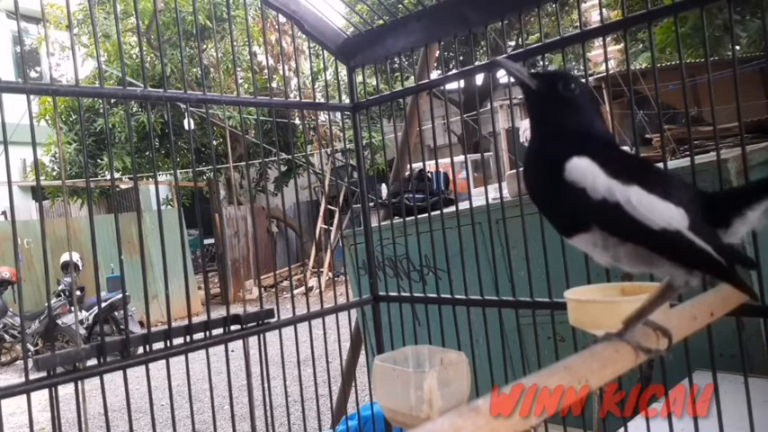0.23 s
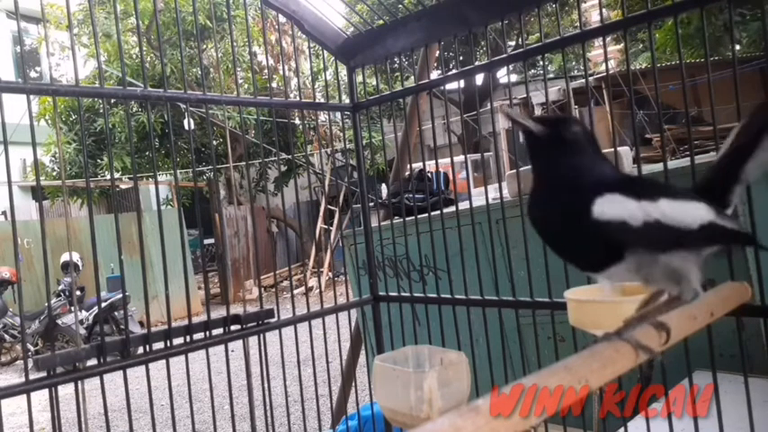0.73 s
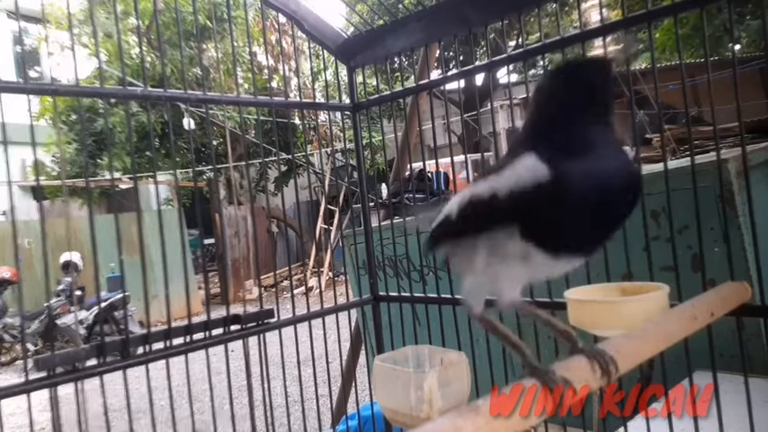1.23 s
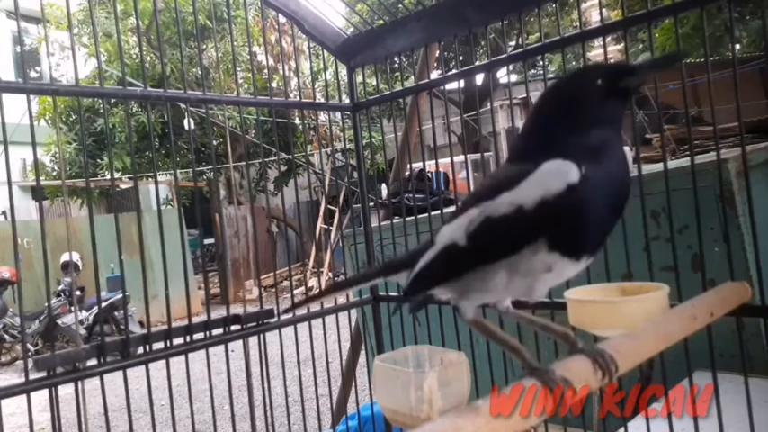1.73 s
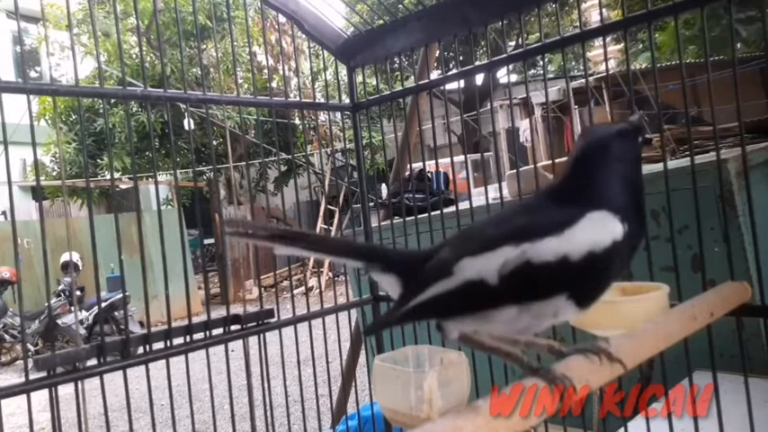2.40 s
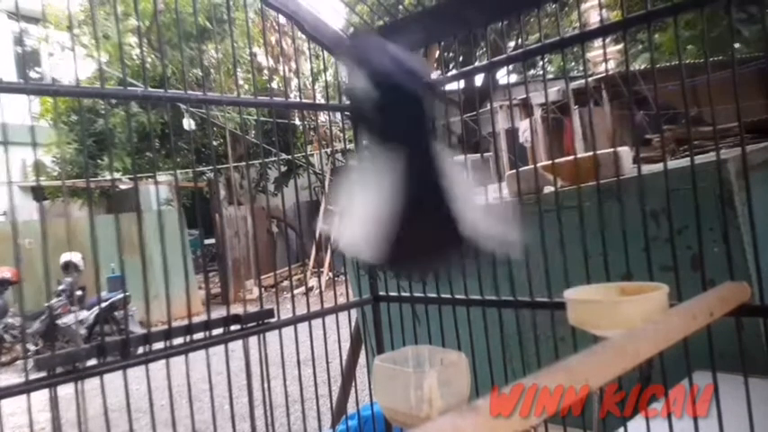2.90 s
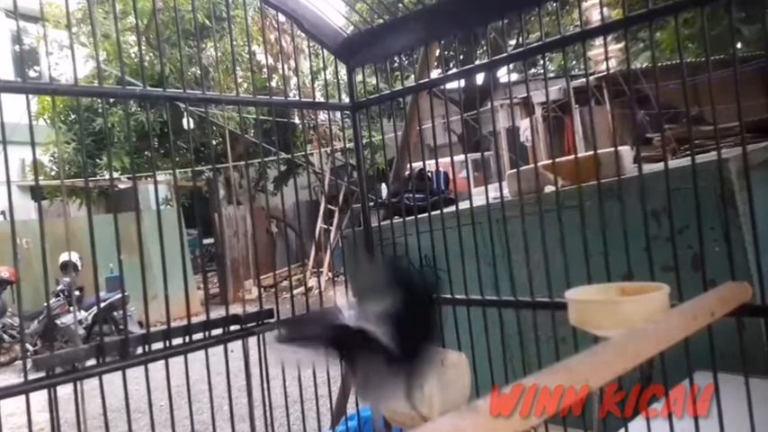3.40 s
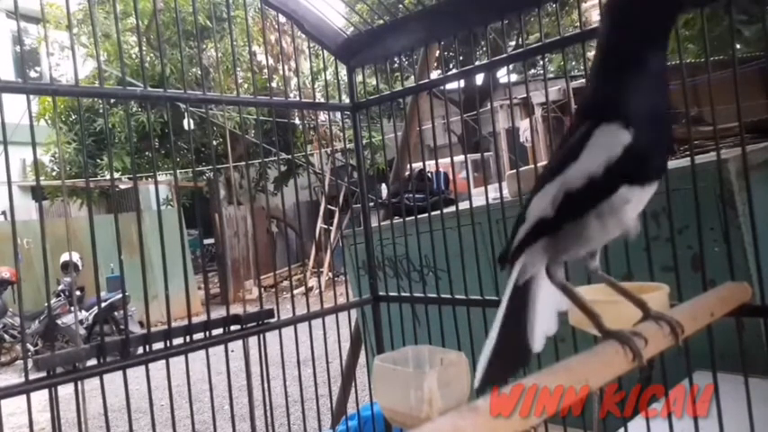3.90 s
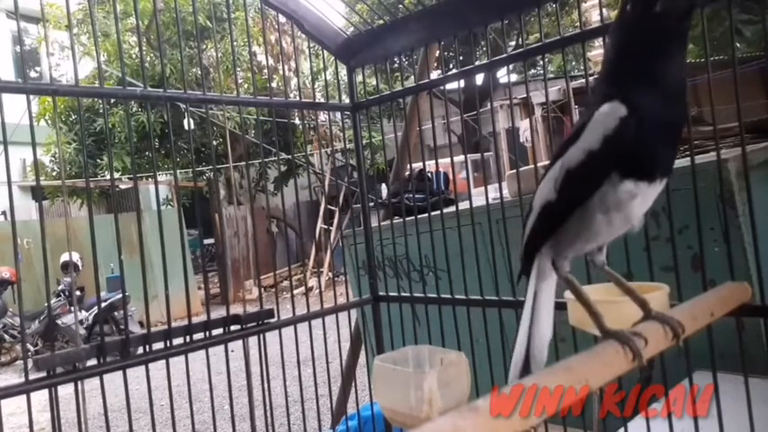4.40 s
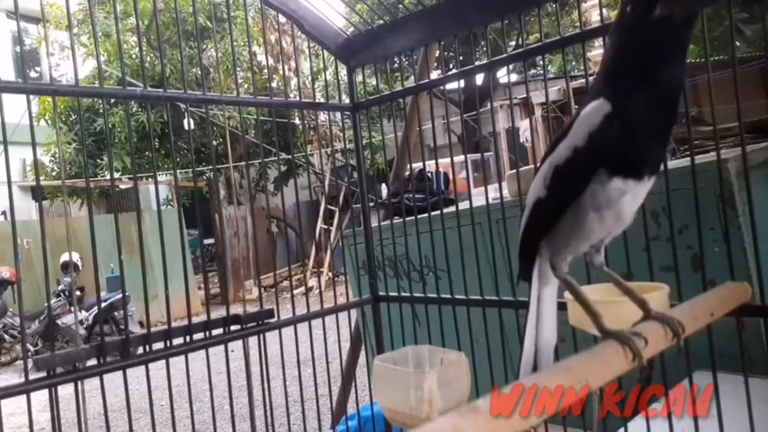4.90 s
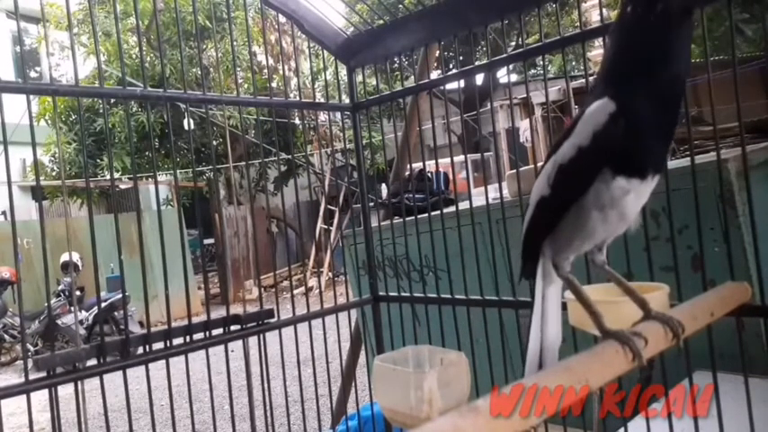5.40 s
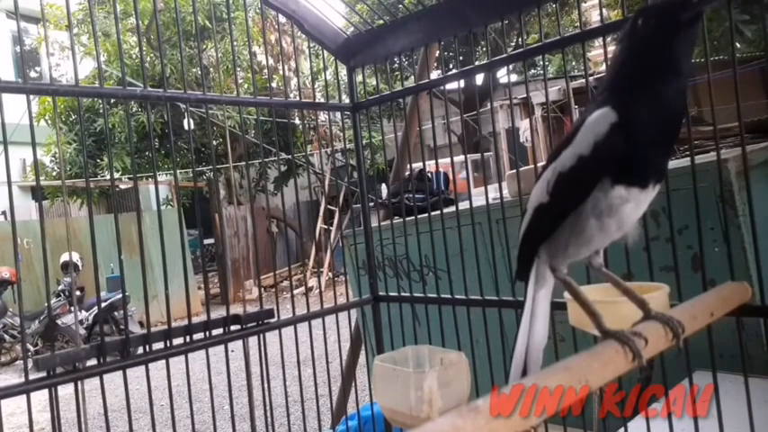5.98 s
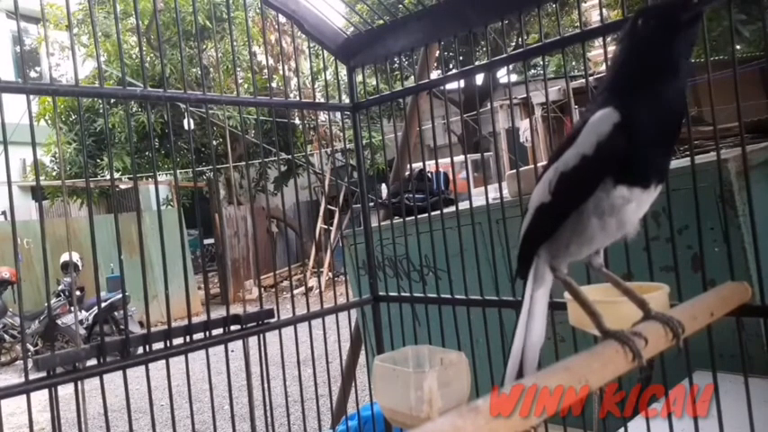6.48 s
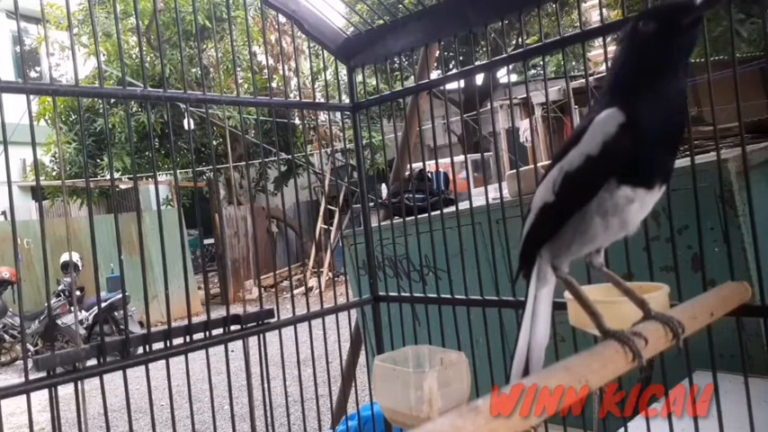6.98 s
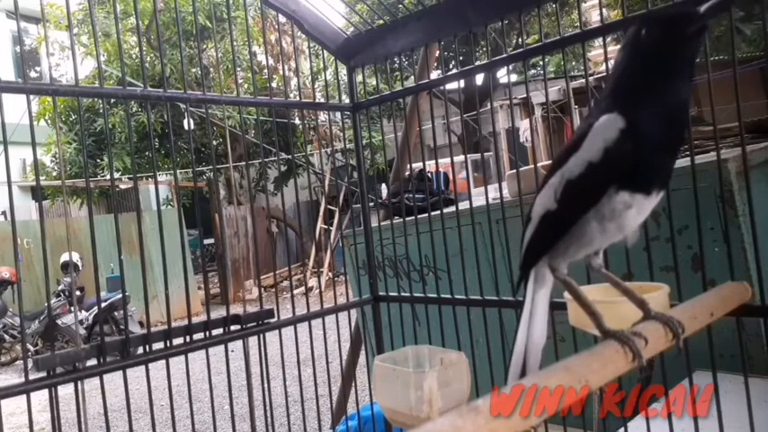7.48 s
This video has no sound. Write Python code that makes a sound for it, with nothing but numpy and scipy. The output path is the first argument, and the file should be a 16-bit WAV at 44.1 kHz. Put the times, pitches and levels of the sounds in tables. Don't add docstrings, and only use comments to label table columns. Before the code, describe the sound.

Faint yard birds and soft whistles lead to a close songbird's piercing chirps, trills and sliding whistles, with rumble and small claw ticks.

```python
import sys
import numpy as np
from scipy import signal
from scipy.fft import rfft, irfft, next_fast_len
from scipy.io import wavfile
from scipy.ndimage import uniform_filter1d, minimum_filter1d, map_coordinates

SR = 44100
rng = np.random.default_rng(int(sys.argv[2]) if len(sys.argv) > 2 else 0)


def ratio_of_db(decibels):
    return 10 ** (np.asarray(decibels, float) / 20)


def dump_mix(stems):
    frames = np.atleast_2d(stems).T
    limited = np.clip(frames, -1, 1)
    pcm = np.round(limited * 32767).astype(np.int16)
    wavfile.write(sys.argv[1], SR, pcm)


N = 340893
SPLIT_HZ = 8780

# (frequency [Hz], level [dB])
BEAK = [(2000, -11.5), (3500, -2), (5200, -1), (6600, -0.5), (7800, 5), (9050, -11), (10600, -2),
        (12200, 4), (13800, 0), (15600, -14)]
# (time [s], length [s], rate [per s], swing [share of pitch])
WARBLES = [
    (4.59, .048, 62, .022),
    (4.955, .045, 77, .008),
    (5.008, .027, 83, .035),
    (2.96, .2, 104, .017),
    (7.17, .12, 90, .028),
    (3.42, .024, 260, .055),
    (7.608, .026, 260, .055),
]


def unit(x):
    return x / np.sqrt(np.mean(x ** 2) + 1e-20)


def along(points, hz):
    f, v = np.transpose(points)
    return np.interp(np.log(hz + 1), np.log(f + 1), v)


def wobble(rate, n=N):
    knots = rng.standard_normal(int(n * rate / SR) + 4)
    return map_coordinates(knots, [np.arange(n) * rate / SR])


def filtered(x, response):
    m = next_fast_len(len(x) + 8192)
    return irfft(rfft(x, m) * response(np.fft.rfftfreq(m, 1 / SR)), m)[:len(x)]


def mix_in(out, start, x):
    out[start:start + len(x)] += x[:len(out) - start]


def columns(rows):
    s, *cols = np.transpose(rows)
    t = np.arange(s[0] - .002, s[-1] + .002, 1 / SR)
    to_end = t[-1] - t + (s[-1] > N / SR - .005)
    edge = np.clip(np.minimum(t - t[0], to_end) / .005, 0, 1)
    curves = [uniform_filter1d(np.interp(t, s, c), size=180, mode="nearest") for c in cols]
    return round(t[0] * SR), edge, curves


def strokes(rows, attack_s, release_s, start_db, end_db, scoop=1, lift=1):
    tables = []
    for s, length, hz, last, db in rows:
        attack_end = s + min(attack_s, .6 * length)
        release = s + length - min(release_s, 0.27 * length)
        tables.append([(s, hz * scoop, db + start_db), (attack_end, hz, db),
                       (release, last, db), (s + length, last * lift, db + end_db)])
    return tables


def breath(level):
    noise = rng.standard_normal(len(level))
    return level * unit(filtered(noise, lambda hz: ratio_of_db(along(BEAK, hz))))


def membrane(hz, overtones_db, jitter, flutter_db):
    unsteady_hz = hz * (1 + jitter * wobble(220.4, len(hz)))
    phase = 2 * np.pi * (np.cumsum(unsteady_hz) / SR + rng.random())
    tone = np.sin(phase)
    for k, db in enumerate(overtones_db, 2):
        tone = tone + ratio_of_db(db + along(BEAK, k * hz)) * np.sin(k * phase) * (k * hz < SR / 2)
    return np.sqrt(2) * tone * ratio_of_db(flutter_db * wobble(87.9, len(hz)))


def sing(tables, overtones_db, jitter, flutter_db, air_db, glide=1, flick=0, warbles=(), arched=False):
    out, air, bend = np.zeros(N), np.zeros(N), np.ones(N + SR)
    for s, length, rate, swing in warbles:
        t = np.arange(0, length, 1 / SR)
        mix_in(bend, round(s * SR), swing * np.sin(2 * np.pi * rate * t))
    for rows in tables:
        start, edge, (hz, level) = columns([(s, f, ratio_of_db(db)) for s, f, db in rows])
        if arched:
            s, f, _ = np.transpose(rows)
            u = np.clip((start + np.arange(len(hz))) / SR, s[0], s[-1]) - s[0]
            curve = np.polyval(np.polyfit(s - s[0], f, len(s) - 1), u)
            hz = (hz + curve) / 2
        hz = uniform_filter1d(hz, max(round(glide), 1), mode="nearest") * bend[start:start + len(hz)]
        hz = hz * (1 + flick * np.exp(-np.arange(len(hz)) / SR / .009))
        mix_in(out, start, edge * level * membrane(hz, overtones_db, jitter, flutter_db))
        mix_in(air, start, edge * level)
    return out + ratio_of_db(air_db) * breath(air)


def walls(x, stretch):
    # (frequency [Hz], time to fall 60 dB [s])
    decay = [(1500, 0.33), (4000, 0.44), (10000, 0.4)]
    hz, t, z = signal.stft(rng.standard_normal(SR * 3 // 4), SR, nperseg=256)
    t60 = stretch * along(decay, hz)[:, None]
    tail = signal.istft(z * ratio_of_db(-60 * t / t60), SR, nperseg=256)[1]
    return signal.fftconvolve(np.pad(x, (500, 0)), tail / np.linalg.norm(tail))[:N]


def yard_level():
    # (time [s], hiss level [dB])
    ducking = [
        (0.0, -49.5),
        (0.5, -46.5),
        (1.9, -45.5),
        (2.3, -47),
        (3.05, -45.5),
        (3.72, -52),
        (4.8, -56.5),
        (6.3, -56),
        (6.78, -54),
        (7.73, -54.5),
    ]
    s, hiss_db = np.transpose(ducking)
    return np.interp(np.arange(N) / SR, s, hiss_db)


def traffic():
    # (frequency [Hz], density [dB per Hz])
    rumble_spectrum = [(13, -46), (22, -51), (48, -5.5), (87, 1.5), (157, -0.5), (231, -7.5), (284, -10),
                       (600, -26), (780, -49), (1320, -120)]
    # (time [s], width [s], level [dB])
    swells = [(.035, .02, 6), (.09, 0.021, -6), (.42, 0.047, -3), (.63, 0.09, 3.5), (1.08, 0.089, -3),
              (1.16, 0.041, 4), (1.8, 0.069, -2), (2.1, 0.078, 5), (2.65, 0.041, 2.5), (3.0, 0.24, -1),
              (3.7, 0.11, -2), (4.8, 0.076, 2), (6.2, 0.11, 0.5), (6.76, .06, 5), (7.05, 0.056, 1.5)]
    opening_db, follows, lumps_db = -29.5, 1.243, 1.1
    idle_hz, idle_db = 100.6, -9
    t = np.arange(N) / SR
    rumble = unit(filtered(rng.standard_normal(N), lambda hz: ratio_of_db(along(rumble_spectrum, hz))))
    turns = idle_hz * np.cumsum(1 + 0.0302 * wobble(6)) / SR
    rumble += ratio_of_db(idle_db + 2 * wobble(3)) * np.sin(2 * np.pi * turns)
    gain_db = yard_level()
    level_db = opening_db + follows * (gain_db - gain_db.max())
    swell_db = sum(db * np.exp(-((t - at) / width) ** 2) for at, width, db in swells)
    return ratio_of_db(level_db + swell_db + lumps_db * wobble(4.1)) * rumble


def leaves():
    # (frequency [Hz], density [dB per Hz])
    hiss_spectrum = [(200, -31), (400, 2.5), (800, -3.5), (1600, -8), (2400, -9), (3300, -10), (4500, -12),
                     (6000, -17.5), (8400, -20), (8750, -46.5), (11500, -35.5), (15500, -47)]
    z = signal.stft(rng.standard_normal(N), nperseg=512)[2]
    patches = uniform_filter1d(rng.standard_normal(z.shape), size=4, axis=0)
    patches = uniform_filter1d(patches, size=14, axis=1)
    noise = signal.istft(z * ratio_of_db(1.84 * unit(patches)), nperseg=512)[1][:N]
    hiss = unit(filtered(noise, lambda hz: ratio_of_db(along(hiss_spectrum, hz))))
    return ratio_of_db(yard_level() + 7.5) * hiss


def far_tones():
    # (time [s], length [s], pitch [Hz], last pitch [Hz], level [dB])
    far_whistles = [(3.85, 0.12, 2180, 2172, -46), (4.13, 0.093, 2190, 2151, -47),
                    (4.23, .07, 2250, 2117, -49.5), (5.6, 0.24, 3650, 3730, -54),
                    (5.77, .11, 3430, 3460, -53), (5.9, .1, 3500, 3470, -59), (6.015, .07, 3480, 3440, -51),
                    (6.11, .25, 3480, 3460, -56), (6.0, 0.22, 3160, 3120, -55.5),
                    (6.03, 0.21, 2850, 2830, -59.5), (6.28, .4, 2956, 2880, -54.5),
                    (6.12, .1, 4950, 4750, -61), (6.28, .05, 6250, 6400, -62)]
    # (time [s], length [s], pitch [Hz], last pitch [Hz], level [dB])
    engines = [
        (.5, 0.42, 445, 453, -50.5),
        (.92, 0.3, 550, 546, -46),
        (1.217, 0.26, 425, 425, -46.5),
        (1.999, 0.53, 440, 448, -48.5),
        (3.15, 0.6, 272, 278, -47),
        (3.848, 0.35, 282, 278.4, -48),
    ]
    tables = strokes(far_whistles + engines, attack_s=.015, release_s=.1, start_db=-1, end_db=-3)
    return sing(tables, [-30], jitter=.007, flutter_db=3.5, air_db=-45)


def insect():
    # (time [s], length [s], pitch [Hz], last pitch [Hz], level [dB])
    spells = [
        (4.55, .26, 7140, 7200, -60),
        (5.06, 0.16, 7230, 7230, -60),
        (5.1, 0.12, 6580, 6580, -64),
        (5.5, .27, 7250, 7250, -61.5),
        (5.85, .2, 7240, 7270, -69),
        (5.8, 0.41, 6360, 6500, -71.5),
        (6.09, 0.3, 7180, 7180, -63),
        (6.52, .15, 7200, 7200, -68),
    ]
    tables = strokes(spells, attack_s=.01, release_s=.05, start_db=-3, end_db=-4)
    return sing(tables, [], jitter=.003, flutter_db=4, air_db=-40)


def distant_birds():
    # (time [s], length [s], pitch [Hz], last pitch [Hz], level [dB])
    faint = [(.01, 0.17, 4220, 4100, -48.5), (0.015, 0.13, 3660, 3700, -51), (0.048, 0.15, 5400, 5170, -49),
             (0.248, 0.23, 3900, 4040, -49), (.28, .07, 4700, 5120, -48), (.35, 0.065, 5060, 4500, -50),
             (0.495, 0.091, 3560, 3500, -49), (.52, 0.094, 4750, 4400, -50.5),
             (0.741, 0.13, 4600, 4720, -45.5), (.9, .15, 4800, 4600, -50.5), (.465, .05, 1660, 1640, -43),
             (1.0, 0.32, 3920, 4220, -49), (1.297, .11, 2232, 2190, -44.5), (1.296, 0.1, 4750, 4600, -50.5),
             (1.38, 0.14, 3820, 3840, -51), (1.6, 0.078, 3380, 3620, -42), (7.452, 0.14, 3630, 3570, -46)]
    tables = strokes(faint, attack_s=.03, release_s=.06, start_db=-5, end_db=-6)
    calls = sing(tables, [-30], jitter=.013, flutter_db=4.5, air_db=-20, glide=300)
    return ratio_of_db(-10) * calls + ratio_of_db(-5) * walls(calls, .6)


def trees():
    spread, least = [7.4, 1900, 6, .08, .12], [.01, 3500, -52, .03, .92]
    calls = []
    for s, hz, db, length, slide in rng.random((36, 5)) * spread + least:
        calls.append([(s, hz, db + 2.5), (s + 0.023, hz * 1.3, db),
                      (s + 0.029 + length, hz * slide, db - 14.5)])
    scatter = sing(calls, [-30], jitter=.008, flutter_db=3, air_db=-30)
    return ratio_of_db(-3) * walls(ratio_of_db(yard_level() + 42.5) * scatter, .6)


def small_birds():
    # (time [s], length [s], pitch [Hz], last pitch [Hz], level [dB])
    dropping = [(1.762, 0.018, 4250, 3950, -30), (1.71, .07, 7750, 7700, -43),
                (1.928, 0.023, 3830, 3790, -27), (1.93, 0.015, 7570, 8500, -33),
                (2.608, 0.031, 3160, 2910, -29), (2.631, .029, 5000, 4450, -21),
                (2.63, 0.02, 8700, 7300, -32), (6.678, .033, 3050, 2750, -43.5),
                (6.7, 0.024, 4900, 4550, -35.5), (7.2, .016, 7850, 7300, -43),
                (6.9, 0.03, 3700, 3380, -35.5), (7.6, 0.026, 7120, 5800, -48),
                (1.6, 0.015, 5900, 6070, -39.5)]
    # (time [s], length [s], pitch [Hz], last pitch [Hz], level [dB])
    level_cheeps = [(1.705, 0.013, 3510, 3540, -34), (1.716, 0.053, 2530, 2540, -37),
                    (1.77, 0.015, 8330, 8170, -36.5), (1.812, 0.022, 3090, 3160, -26),
                    (1.84, 0.04, 3100, 3040, -43), (1.822, .014, 5980, 5780, -35),
                    (1.835, 0.029, 6270, 6920, -23.5), (1.84, 0.027, 5600, 5900, -37.5),
                    (1.94, 0.039, 3216, 3170, -35), (1.95, 0.025, 6430, 6320, -28.5),
                    (1.97, 0.025, 5040, 4826, -31.5), (2.602, 0.009, 5130, 4970, -25.5),
                    (2.606, .03, 6430, 5550, -29.5), (2.665, 0.035, 4460, 4450, -46),
                    (4.481, .01, 3300, 2690, -35.5), (4.374, .025, 2980, 2920, -41.5),
                    (4.374, 0.022, 4550, 4430, -34), (6.671, .01, 6620, 6330, -41),
                    (6.677, 0.025, 6070, 5750, -36.5), (6.705, 0.036, 5400, 5200, -42.5),
                    (6.75, .012, 3600, 3400, -46), (6.788, 0.027, 2110, 2180, -44),
                    (6.818, 0.027, 4935, 4900, -47), (6.862, 0.034, 4900, 4650, -45),
                    (6.83, 0.024, 5850, 6320, -38.5), (6.925, 0.016, 6580, 6400, -43.5),
                    (6.935, 0.02, 6000, 5740, -43.5), (6.945, 0.032, 4210, 4360, -41),
                    (6.945, 0.034, 8700, 8530, -46.5), (6.885, .02, 6150, 6250, -48)]
    drops = strokes(dropping, attack_s=.009, release_s=.012, start_db=-12, end_db=-8)
    cheeps = strokes(level_cheeps, attack_s=.006, release_s=.01, start_db=-10, end_db=-8)
    twitter = sing(drops, [-14], jitter=.016, flutter_db=3.5, air_db=-7, flick=.12)
    twitter += sing(cheeps, [-16], jitter=.021, flutter_db=3, air_db=-8)
    rasping = twitter * ratio_of_db(2.6 * wobble(650))
    dulled = filtered(rasping, lambda hz: ratio_of_db(-2.2 * np.maximum(hz / 1000 - 7.5, 0)))
    return ratio_of_db(-3) * dulled + ratio_of_db(-3) * walls(dulled, .6)


def bird_across_yard():
    # (time [s], pitch [Hz], level [dB])
    phrases = [
        [(0.01, 2806, -37.5), (0.11, 2600, -31), (0.164, 2820, -30.5), (0.181, 3290, -28.5), (0.195, 3280, -45)],
        [(0.545, 3100, -49), (0.556, 2990, -25.5), (0.585, 2560, -28), (0.635, 1935, -36), (0.695, 1730, -35.5)],
    ]
    # (time [s], length [s], pitch [Hz], last pitch [Hz], level [dB])
    rising = [
        (.318, 0.068, 2690, 2700, -26),
        (.815, 0.079, 2705, 3193, -23.5),
        (1.055, .085, 2720, 3244, -24.5),
    ]
    # (time [s], length [s], pitch [Hz], last pitch [Hz], level [dB])
    drawn = [
        (2.1, 0.21, 3490, 3480, -40),
        (2.32, 0.27, 3186, 3200, -44.5),
        (2.7, 0.27, 3420, 4020, -48.5),
    ]
    risers = strokes(rising, attack_s=0.042, release_s=.008, start_db=-27.0, end_db=-15.0, scoop=.83)
    slow = strokes(drawn, attack_s=.02, release_s=.08, start_db=-6, end_db=-12)
    song = sing(phrases + risers + slow, [-40], jitter=.006, flutter_db=2.2, air_db=-36, glide=200)
    return ratio_of_db(-1.5) * song + ratio_of_db(-2.5) * walls(song, .85)


def next_cage():
    # (time [s], pitch [Hz], level [dB])
    long_notes = [
        [(2.942, 3600, -45), (2.964, 3840, -26), (3.05, 3990, -22.5), (3.09, 3930, -23), (3.135, 3815, -21.5),
         (3.19, 3785, -20), (3.25, 3800, -18.5), (3.263, 3850, -31)],
        [(7.133, 3680, -46), (7.16, 3960, -40), (7.2, 3980, -36.5), (7.29, 4020, -34.5)],
    ]
    # (time [s], length [s], pitch [Hz], last pitch [Hz], level [dB])
    short_notes = [
        (3.258, .04, 3850, 3840, -27),
        (3.29, .03, 3860, 3890, -17.5),
        (3.316, .03, 3890, 3930, -26),
        (3.338, .048, 3950, 3980, -18.5),
        (7.38, .078, 3820, 3790, -36),
        (3.58, .065, 2020, 2070, -38.5),
    ]
    # (time [s], length [s], pitch [Hz], last pitch [Hz], level [dB])
    flicked_notes = [
        (3.385, 0.058, 4050, 4170, -23.5),
        (7.46, 0.17, 3880, 4145, -32),
    ]
    # (time [s], pitch [Hz], level [dB])
    fall = [
        [(3.655, 3040, -32), (3.679, 2480, -31.5), (3.69, 2590, -34), (3.785, 2300, -36.5)],
    ]
    short = strokes(short_notes, attack_s=0.023, release_s=0.023, start_db=-17.5, end_db=-24.0, scoop=1.0)
    flicked = strokes(flicked_notes, attack_s=0.022, release_s=0.021, start_db=-16.0, end_db=-14.5,
                      scoop=0.96, lift=1.28)
    soft = sing(long_notes + short + flicked, [-26, -28, -42], jitter=0.0026, flutter_db=1.5,
                air_db=-47.5, warbles=WARBLES)
    soft += sing(fall, [-36], jitter=.018, flutter_db=4.5, air_db=-40)
    return soft + ratio_of_db(-5.5) * walls(soft, 0.49)


def claws():
    # (time [s], peak level [dB])
    ticks = [(0.9078, -21.5), (0.956, -25.5), (1.2492, -19.5), (1.2904, -25), (1.553, -20.5),
             (1.833, -23.5), (2.604, -22), (3.2965, -24), (3.3806, -30), (6.676, -35), (6.817, -40)]
    out, t = np.zeros(N), np.arange(SR // 20) / SR
    for s, db in ticks:
        mix_in(out, round(s * SR), ratio_of_db(db - 14.5 - 60 * t / 0.01) * rng.standard_normal(len(t)))
    ring = [(2000, -27), (4500, 14.5), (7000, 16.0), (15000, -12)]  # (Hz, dB)
    return filtered(out, lambda hz: ratio_of_db(along(ring, hz)))


def trills():
    # (time [s], low pitch [Hz], high pitch [Hz], level [dB])
    shaken = [
        [(4.4215, 2800, 4560, -11), (4.427, 2690, 4580, -14), (4.444, 2600, 4620, -14),
         (4.454, 2514, 4450, -17), (4.462, 2350, 4250, -32)],
        [(7.278, 4005, 5750, -19), (7.285, 4094, 5900, -44), (7.291, 4250, 6070, -14), (7.31, 4050, 5800, -11),
         (7.326, 3900, 5380, -10.5), (7.342, 3780, 4750, -11), (7.367, 3550, 4320, -17),
         (7.379, 3250, 4270, -34)],
    ]
    low_side_db = [-13, -7.5]
    shake_rate, slows = 123, 19
    full_swing, swing_grows_s = .095, .004
    out = np.zeros(N)
    for rows, lead, side_db in zip(shaken, (-.75, -.07), low_side_db):
        start, edge, (low_hz, high_hz, high_db) = columns(rows)
        rate = shake_rate - slows * np.maximum(high_hz / 1000 - 4.8, 0)
        low_db = high_db + side_db
        swing = full_swing * (1 - np.exp(-np.arange(len(edge)) / SR / swing_grows_s))
        shake = np.cos(2 * np.pi * (np.cumsum(rate) / SR + lead))
        closing = np.sqrt(2 + 2 * shake) * np.clip((high_hz - 5250) / 950, .2, 1)
        low = membrane(low_hz * (1 + .9 * swing * shake), [-12, -20], .035, 3.5)
        low = ratio_of_db(low_db + 7 - 15 * closing) * low
        high = membrane(high_hz * (1 + swing * shake), [-24], .02, 2.5)
        high = ratio_of_db(high_db + 4.5 - 9.5 * closing) * high
        coupling = ratio_of_db(6.0) * filtered(low * high, lambda hz: hz > 5500)
        air = breath(ratio_of_db(high_db - 12.5 - 6.7 * closing))
        mix_in(out, start, edge * (low + high + coupling + air))
    return out


def arches(side):
    # (time [s], length [s], top pitch of lower side [Hz], of upper side [Hz], level [dB])
    singles = [
        (3.476, 0.048, 3740, 6150, -5.5),
        (3.786, .05, 3854, 5800, -5.5),
    ]
    series = [
        (3.924, 0.069, 4150, 6250, -6.5),
        (4.008, 0.062, 4270, 6480, -4),
        (4.092, 0.06, 4235, 6430, -4.5),
        (4.176, 0.068, 4316, 6470, -7),
    ]
    # (share of length, low pitch [share of top], low level [dB],
    # high pitch [share of top], high level [dB])
    single_arch = [(0, .62, -40, .64, -33), (0.198, .93, -9.5, .92, -6), (0.379, 0.98, -6.5, 1, -2),
                   (0.603, 0.92, 0.5, 0.96, -5), (0.799, .8, -16.5, .78, -5), (1, 0.522, -21.5, .5, -20)]
    series_arch = [(0, .68, -32, .55, -50), (0.19, .93, -12, .9, -12), (.34, 1, 1.5, 1, 0.5),
                   (0.502, 0.95, -4.5, .97, -2.5), (.75, .87, -12, .83, -4.5), (1, .77, -28, 0.6, -32)]
    tables = []
    for rows, arch in ((singles, single_arch), (series, series_arch)):
        for s, length, *tops, db in rows:
            tables.append([(s + length * row[0], tops[side] * row[1 + 2 * side], db + row[2 + 2 * side])
                           for row in arch])
    return tables


def chirps():
    # (time [s], length [s], pitch [Hz], last pitch [Hz], level [dB])
    murmurs = [
        (3.98, .034, 2660, 2760, -37),
        (4.062, 0.031, 2610, 2690, -33.5),
    ]
    low = sing(arches(side=0), [-13, -20], jitter=.011, flutter_db=2, air_db=-19, glide=120, arched=True)
    high = sing(arches(side=1), [-19], jitter=.008, flutter_db=2, air_db=-20, glide=120, arched=True)
    low, high = low * ratio_of_db(1.6 * wobble(700)), high * ratio_of_db(1.3 * wobble(700))
    coupling = filtered(low * high, lambda hz: (ratio_of_db(-2.0) * (hz > 6000)
                                                + ratio_of_db(-18.5) * (hz > 1500) * (hz < 3000)))
    links = strokes(murmurs, attack_s=0.011, release_s=0.0083, start_db=8.0, end_db=5.5, scoop=1.2, lift=1.0)
    catch = 1 - 0.67 * np.exp(-((np.arange(N) / SR - 3.5035) / 0.0016) ** 2)
    murmur = sing(links, [-9], jitter=0.0085, flutter_db=-3.0, air_db=-29.0)
    return catch * (low + high + coupling) + murmur


def whistles():
    # (time [s], pitch [Hz], level [dB])
    phrase_1 = [
        [(4.488, 2450, -28), (4.495, 3660, -8.5), (4.502, 3140, -12.5), (4.509, 3320, -6), (4.524, 2330, -20.5),
         (4.533, 3070, -12.5), (4.541, 2060, -31)],
        [(4.541, 2024, -21.5), (4.55, 2870, -7), (4.559, 2580, -10), (4.57, 2805, -6), (4.603, 2932, -6.5),
         (4.634, 2827, -7), (4.64, 2690, -9.5), (4.673, 2520, -12), (4.685, 2340, -29.5)],
    ]
    phrase_2 = [
        [(4.806, 5350, -27.5), (4.818, 4610, -17.5), (4.836, 3958, -7.5), (4.858, 3854, -9), (4.882, 3770, -16),
         (4.924, 3195, -10), (4.959, 3240, -17), (4.966, 3264, -9), (4.999, 3263, -8.5)],
        [(5.0, 3207, -11.5), (5.002, 3330, -1), (5.01, 2790, -14), (5.016, 2850, -10), (5.05, 2508, -11.5),
         (5.062, 2402, -18.5), (5.068, 2410, -44)],
    ]
    phrase_3 = [
        [(5.24, 4100, -39), (5.25, 3960, -12.5), (5.264, 3860, -8.5), (5.312, 3785, -16), (5.332, 3564, -9),
         (5.354, 3213, -12.5), (5.398, 3274, -7.5), (5.408, 3270, -15.5), (5.432, 3190, -32)],
        [(5.401, 3010, -20.5), (5.407, 2916, -10), (5.416, 2830, -13.5), (5.43, 2633, -14.5),
         (5.448, 2565, -10.5), (5.47, 2727, -11.5), (5.484, 2760, -29), (5.49, 2590, -25.5)],
        [(5.49, 2520, -30), (5.526, 2266, -15.5), (5.542, 2194, -12), (5.564, 2260, -14), (5.576, 2360, -23.5),
         (5.584, 2440, -34)],
    ]
    # (time [s], length [s], pitch [Hz], last pitch [Hz], level [dB])
    level_notes = [
        (5.628, 0.13, 1846, 1802, -23.5),
        (7.685, 0.092, 3793, 3850, -11.5),
    ]
    # (time [s], length [s], beats [per s], depth [0-1])
    breaks = [
        (4.5035, .03, 195, .65),
        (4.549, .017, 290, .85),
        (4.898, .03, 200, .75),
        (4.994, .022, 140, .85),
        (5.016, .012, 300, .4),
        (5.34, .06, 300, .2),
        (5.4, .02, 300, .15),
    ]
    # (time [s], length [s], depth [0-1])
    catches = [
        (4.5742, .003, .75),
        (4.579, 0.003, 0.7),
        (4.614, 0.0064, .6),
        (4.62, 0.0037, 0.5),
        (4.976, .011, 0.5),
        (4.991, 0.015, .3),
        (5.275, 0.016, 0.4),
        (5.375, 0.012, 0.5),
        (5.403, .004, 0.7),
    ]
    overtones = [-28, -34, -38, -33, -39]
    gain, leak = np.ones(N), np.zeros(N)
    for s, length, rate, depth in breaks:
        t = np.arange(0, length, 1 / SR)
        share = depth * np.sin(np.pi * t / length)
        mix_in(gain, round(s * SR), -.6 * share * (1 - np.cos(2 * np.pi * rate * t)))
        mix_in(leak, round(s * SR), share)
    for s, length, depth in catches:
        mix_in(gain, round((s - length / 2) * SR), -depth * np.hanning(round(length * SR)))
    level = strokes(level_notes, attack_s=0.031, release_s=0.017, start_db=-15.5, end_db=-21,
                    scoop=1.02, lift=0.98)
    tone = sing(phrase_1 + phrase_2 + phrase_3 + level, overtones, jitter=.0015, flutter_db=.6,
                air_db=-57, glide=100, warbles=WARBLES)
    bright = filtered(tone, lambda hz: (hz > 4800) & (hz < 8700))
    hoarse = leak * wobble(1200) * (.17 * tone + 1.5 * bright)
    escaping = breath(leak * uniform_filter1d(np.abs(tone), size=200))
    air = filtered(escaping, lambda hz: ratio_of_db(-12.0 * (hz > SPLIT_HZ)))
    return gain * tone + hoarse + ratio_of_db(-24.5) * air


def scene():
    # (delay [s], level [dB])
    echoes = [(.0021, -19), (.0047, -20), (.0088, -21), (.0135, -23), (.022, -26)]
    background = traffic() + leaves() + far_tones() + insect()
    neighbours = distant_birds() + trees() + small_birds() + bird_across_yard() + next_cage()
    singer = claws() + trills() + chirps() + whistles()
    close = sum(ratio_of_db(db) * np.pad(singer, (round(s * SR), 0))[:N] for s, db in echoes)
    return (background + neighbours + singer + close + ratio_of_db(-22) * walls(singer, 0.79))[None]


def limiter(x):
    need = np.minimum(1, .94 / (np.abs(x) + 1e-9))
    return x * uniform_filter1d(minimum_filter1d(need, size=120), size=60)


def spectra(x):
    return signal.stft(x, SR, nperseg=256)[2]


def tiled(z, size=(6, 8)):
    power = np.abs(z) ** 2
    for axis, step in enumerate(size):
        sums = np.add.reduceat(power, np.arange(0, z.shape[axis], step), axis=axis)
        power = np.repeat(sums, step, axis=axis).take(np.arange(z.shape[axis]), axis=axis)
    return power + 1e-16


def copied_treble(x):
    # (from [Hz], to [Hz], shift [Hz])
    shifts = [(8950, 15690, 8260)]
    bottom_hz, top_hz, guard_hz = shifts[0][0], 15690, 300
    copy = np.zeros(N)
    for lo_hz, hi_hz, shift_hz in shifts:
        middle = filtered(x, lambda hz: (hz > lo_hz - shift_hz) & (hz < hi_hz - shift_hz))
        band = signal.hilbert(middle, next_fast_len(N))[:N]
        copy += np.real(band * np.exp(2j * np.pi * shift_hz * np.arange(N) / SR))
    z = spectra(copy)
    true = tiled(spectra(filtered(x, lambda hz: hz > bottom_hz + guard_hz)))
    hush = spectra(rng.standard_normal(N))
    rebuilt = z * np.minimum(np.sqrt(true / tiled(z)), 1.6)
    rebuilt = rebuilt + ratio_of_db(-5.5) * hush * np.sqrt(true / tiled(hush))
    treble = signal.istft(rebuilt, SR, nperseg=256)[1][:N]
    return filtered(treble, lambda hz: (hz > bottom_hz) & (hz < top_hz))


def roll_off(x):
    return signal.sosfilt(signal.butter(12, 15680, fs=SR, output="sos"), x)


def record(dry):
    held = limiter(dry[0])
    mix = filtered(held, lambda hz: hz < SPLIT_HZ) + copied_treble(held)
    return roll_off(mix[None])


dry = scene()
out = record(dry)
dump_mix(out)
```